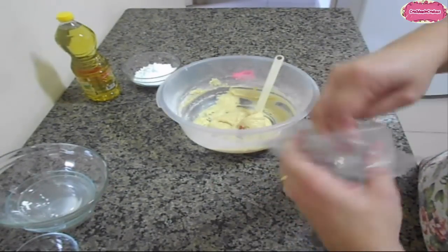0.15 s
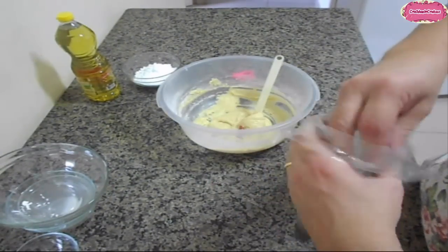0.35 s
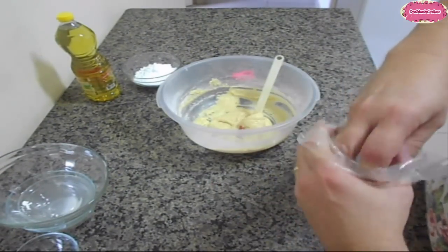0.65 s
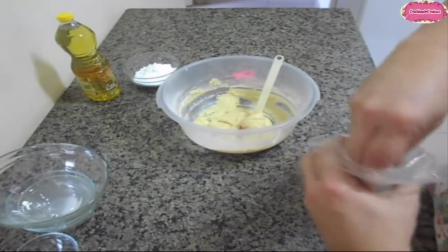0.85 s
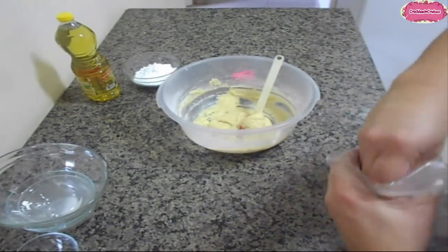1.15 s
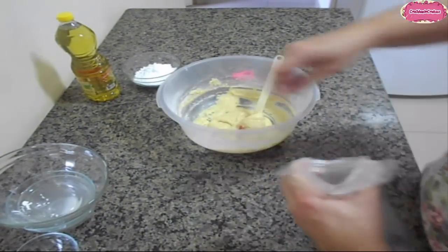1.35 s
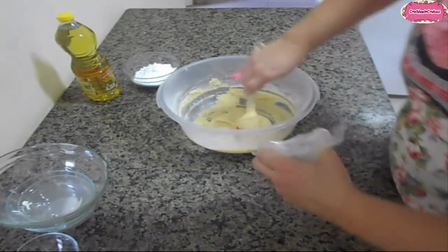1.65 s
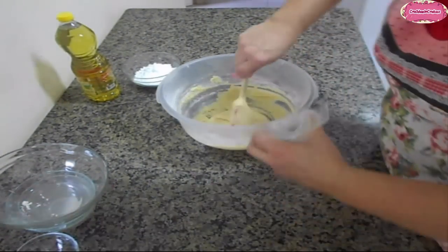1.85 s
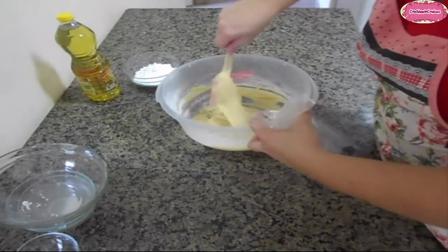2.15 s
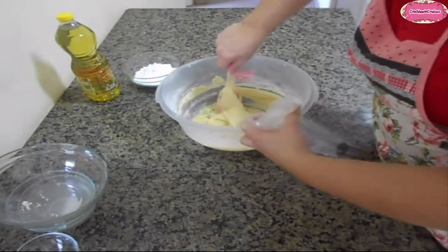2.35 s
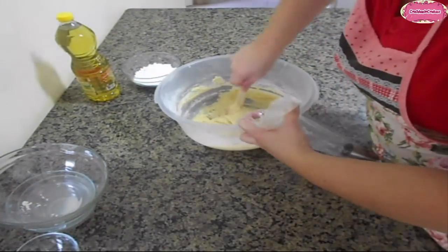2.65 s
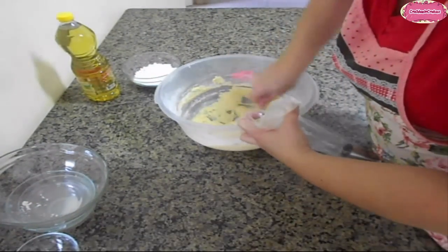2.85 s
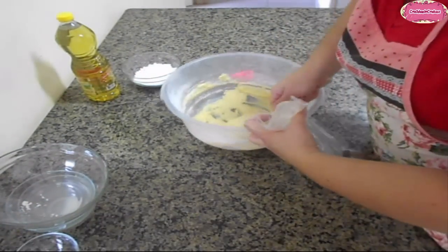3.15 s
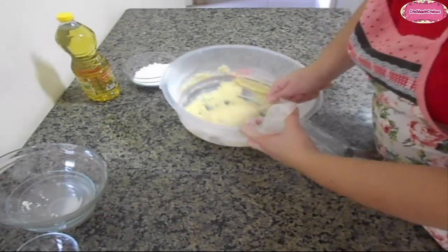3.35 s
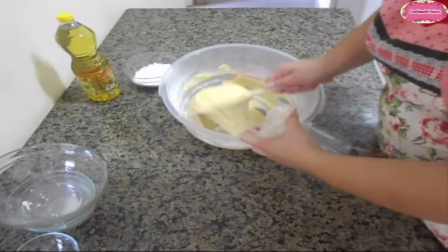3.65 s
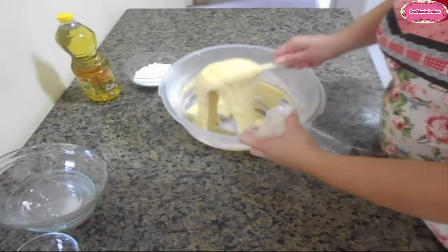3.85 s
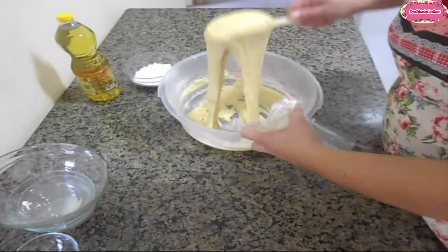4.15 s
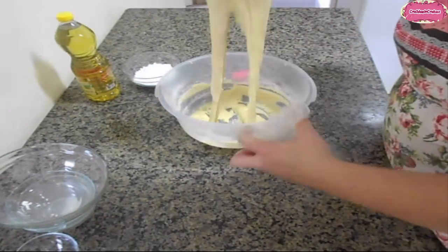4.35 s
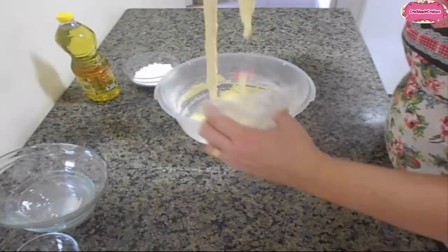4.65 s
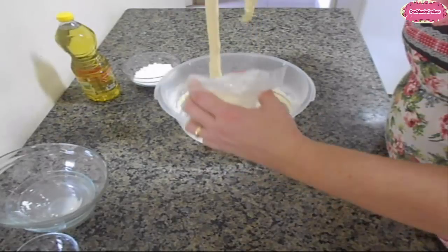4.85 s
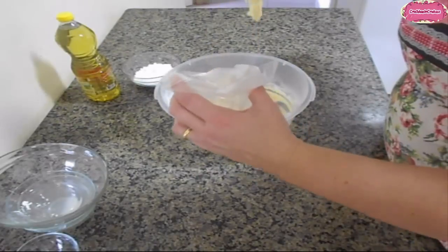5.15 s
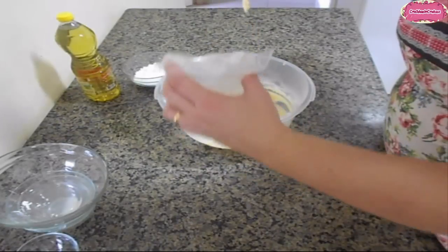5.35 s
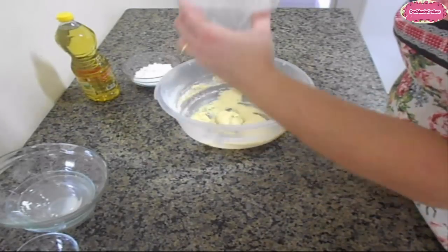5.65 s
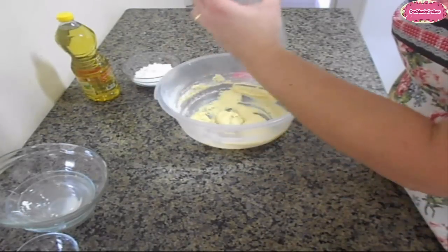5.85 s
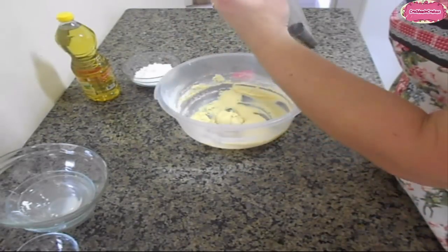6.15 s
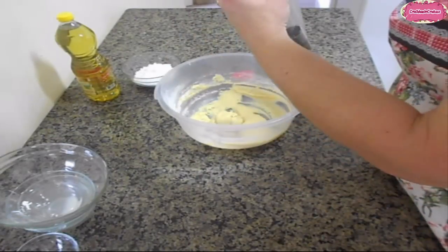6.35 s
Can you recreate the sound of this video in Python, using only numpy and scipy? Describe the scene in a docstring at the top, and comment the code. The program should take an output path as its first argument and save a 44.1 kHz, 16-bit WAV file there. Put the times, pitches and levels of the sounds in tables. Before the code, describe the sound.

Crackling plastic film, soft wet stirring of heavy batter, muffled bowl bumps and one short scrape, over low electrical hum in a reverberant kitchen.

```python
"""A thin plastic piping bag is folded by hand: creases buckle as noise bursts, while folds, wrinkles and film
rustle as random grains and short rings. A spoon in a plastic bowl stirs thick batter (dull grains), knocks
(resonant pushes) and scrapes (stick-slip through wall resonances).
A tiled kitchen reverberates over mains hum (sine harmonics), room noise and a thin whine (filtered noise)."""
import sys
import numpy as np
from scipy import signal
from scipy.fft import rfft, irfft, next_fast_len
from scipy.io import wavfile
from scipy.ndimage import uniform_filter1d, map_coordinates

SR = 44100
rng = np.random.default_rng(int(sys.argv[2]) if len(sys.argv) > 2 else 0)


def transcribe(u):
    """Save the signal u as a 16-bit wav file named by the first command-line argument.

    u: samples, shape (n,) or (channels, n), limited to [-1, 1]; the rate is SR.
    q: integer samples, one column per channel.
    """
    v = np.clip(np.atleast_2d(u).T, -1, 1)
    q = np.round(v * 32767).astype(np.int16)
    wavfile.write(sys.argv[1], SR, q)


N = 287091
TOP_HZ = 15750  # upper band limit


def amp(db):
    """Logarithmic level: decibels to amplitude gain."""
    return 10 ** (np.asarray(db) / 20)


def unit(x):
    """Power normalization: scale to rms 1."""
    return x / np.sqrt(np.mean(x ** 2) + 1e-20)


def along(points, hz):
    """Logarithmic frequency scale: interpolate (frequency_hz, value) points."""
    f, v = np.transpose(points)
    return np.interp(np.log(hz + 1), np.log(f), v)


def curves(rows):
    """Linear interpolation in time: one curve for each column after the time."""
    s, *cols = np.transpose(rows)
    return [np.interp(np.arange(N) / SR, s, c) for c in cols]


def wobble(rate):
    """Slow random modulation: a smooth curve through rate random knots a second."""
    knots = rng.standard_normal(int(N * rate / SR) + 4)
    return map_coordinates(knots, [np.arange(N) * rate / SR])


def coloured(x, gain, size=4096):
    """Minimum-phase filtering: a folded cepstrum makes the given gain of frequency causal."""
    log_gain = np.log(np.maximum(gain(np.fft.rfftfreq(size, 1 / SR)), 1e-6))
    cepstrum = irfft(log_gain)
    cepstrum[1:size // 2] *= 2
    cepstrum[size // 2 + 1:] = 0
    impulse_response = irfft(np.exp(rfft(cepstrum)))
    return signal.fftconvolve(x, impulse_response)[:len(x)]


def hump(hz, centre_hz, octaves):
    """Broad resonance: the gain is 1 at the centre and 1/8 at the given distance in octaves."""
    return (1 + (np.log2((hz + 1) / centre_hz) / octaves) ** 2) ** -3.


def add(track, s, sound):
    """Superposition: mix a sound into the track at time s."""
    part = track[max(round(s * SR), 0):][:len(sound)]
    part += sound[:len(part)]


def burst(envelope, size=9):
    """Spectral whitening: enveloped noise is divided by its smoothed spectrum to remove its broad colour."""
    spectrum = rfft(envelope * rng.standard_normal(len(envelope)))
    power = uniform_filter1d(np.abs(spectrum) ** 2, size)
    return irfft(spectrum / np.sqrt(np.abs(power) + 1e-12), len(envelope))


def grains(rate, spread_db, t60):
    """Stick-slip as a random point process: uneven tiny slips, each a short decaying burst; rms 1."""
    chance = rng.random(N)
    size = np.minimum(rng.standard_normal(N), 2.3)
    power = (chance < rate / SR) * amp(spread_db * size) ** 2
    t = np.arange(SR // 40) / SR
    decay_power = amp(-60 * t / t60) ** 2
    envelope = np.sqrt(np.abs(signal.fftconvolve(power, decay_power)[:N]))
    return unit(envelope * rng.standard_normal(N))


def texture(spectrum, rate, spread_db, t60, smooth):
    """Friction noise: grains over an even rub, filtered to the colour of their material; rms 1."""
    drive = grains(rate, spread_db, t60) + smooth * rng.standard_normal(N)
    return unit(coloured(drive, lambda hz: amp(along(spectrum, hz))))


def crinkles(rate, centre_hz, octaves, cycles, spread_db):
    """Snap-through of wrinkles: each flips at random and rings briefly at its own pitch; rms 1."""
    draws = rng.random((int(rate * N / SR), 4))
    start = (draws[:, :1] * N).astype(int)
    pitch_offset = octaves * (draws[:, 1:2] + draws[:, 2:3] - 1)
    hz = np.minimum(centre_hz * 2 ** pitch_offset, TOP_HZ)
    size = amp(spread_db * np.minimum(-np.log(1 - draws[:, 3:]), 3))
    n = np.arange(SR // 100)
    turns = hz * n / SR
    # each ring falls 60 dB in the given number of cycles
    rings = size * np.sin(2 * np.pi * turns) * amp(-60 * turns / cycles)
    return unit(np.bincount((start + n).ravel(), rings.ravel(), N)[:N])


def strokes(rows, attack_s, release_db_per_s):
    """Movement envelope: gain rises until each start, holds for its length and decays exponentially."""
    t = np.arange(N) / SR
    gains = []
    for s, length, db in rows:
        attack = np.clip(1 + (t - s) / attack_s, 0, 1)
        gains.append(attack * amp(db - release_db_per_s * np.maximum(t - s - length, 0)))
    return np.max(gains, axis=0)


# harmonics of the mains hum: multiple [of MAINS_HZ], relative_level [dB]
HUM_HARMONICS = [(1, 0.5), (2, -20.5), (4, -15), (5, -43.5), (10, -20.5), (11, -15.5), (13, -26)]
MAINS_HZ = 59.25
# slow course of the hum: time_s [s], level_db [dB]
HUM_COURSE = [(0, -56), (.6, -56), (1.7, -49.5), (4.1, -47.5), (4.7, -52), (6.5, -47)]
# swells of the whole background: start_s [s], end_s [s], rise_db [dB]
BACKGROUND_SWELLS = [(2.95, 3.05, 7.5), (3.712, 3.822, 7), (4.07, 4.215, 10), (4.39, 4.516, 7.5),
                     (5.238, 5.645, 8.5), (5.918, 6.096, 7.5), (6.226, 6.488, 5.5)]
SWELL_RISE_S, SWELL_FALL_S = 0.13, 0.026
# spectrum of the room noise: frequency_hz [Hz], relative_level [dB]
AIR_SPECTRUM = [(18, 14.5), (27, 21), (36, 25), (48, -9), (90, 6), (160, 2), (400, -0.5), (700, -4.5),
                (1200, -5.5), (2300, -7.5), (3000, 0.5), (3900, -10), (7000, -6), (15000, -25)]
# bands of the thin high whine: centre_hz [Hz], half_width_hz [Hz], relative_level [dB]
WHINE_BANDS = [(7100, 160, 0), (15000, 200, -7)]


def background(air_db=-53, whine_db=-64, follow=1.0, waver_db=0.9):
    """Additive synthesis and common modulation: hum harmonics, room noise and whine swell together."""
    t = np.arange(N) / SR
    swell_db = np.zeros(N)
    for start, end, db in BACKGROUND_SWELLS:
        rise = np.clip((t - start) / SWELL_RISE_S, 0, 1)
        fall = np.clip(1 - (t - end) / SWELL_FALL_S, 0, 1)
        swell_db += db * rise * fall
    hum_db = curves(HUM_COURSE)[0] + swell_db + waver_db * wobble(9.9)
    phase = 2 * np.pi * MAINS_HZ * t + 0.051 * wobble(3.25)
    hum = sum(amp(db) * np.sin(k * phase + rng.uniform(0, 2 * np.pi)) for k, db in HUM_HARMONICS)
    air = unit(coloured(rng.standard_normal(N), lambda hz: amp(along(AIR_SPECTRUM, hz))))

    def whine_gain(hz):
        return sum(amp(db) / (1 + ((hz - c) / w) ** 2) for c, w, db in WHINE_BANDS)

    whine = unit(coloured(rng.standard_normal(N), whine_gain))
    noise = amp(air_db) * air + amp(whine_db) * whine
    return amp(hum_db) * unit(hum) + amp(follow * (hum_db - hum_db.mean())) * noise


# reverberation of the kitchen: frequency_hz [Hz], t60_s [s]
KITCHEN_DECAY = [(200, 0.44), (1000, 0.59), (4000, 0.51), (9000, 0.24), (15000, 0.36)]


def kitchen(x, count=16):
    """Diffuse reverberation: hard walls answer with decaying noise, redrawn for each of count equal stretches."""
    out = np.zeros(N)
    for part in np.array_split(np.arange(N), count):
        hz, t, z = signal.stft(rng.standard_normal(SR // 2), SR, nperseg=256)
        decay = amp(-60 * t / along(KITCHEN_DECAY, hz)[:, None])
        tail = signal.istft(z * decay, SR, nperseg=256)[1]
        reply = signal.fftconvolve(x[part], tail / np.linalg.norm(tail))
        add(out, part[0] / SR + .005, reply)
    return out


# spectrum of the batter: frequency_hz [Hz], relative_density [dB per Hz]
BATTER_SPECTRUM = [(60, -18.5), (160, -6.5), (450, 2), (900, 0.5), (1600, -7), (4000, -44)]
# the spoon moves the batter: start_s [s], length_s [s], level_db [dB, before the batter's gain]
BATTER_STIRS = [(1.61, 0.29, -55.5), (1.93, 0.2, -46), (2.375, .14, -44.5), (2.545, 0.051, -42),
                (2.87, .12, -53.5), (3.02, 0.063, -42.5), (3.28, 0.26, -53.5), (3.73, 0.2, -51.5),
                (4.1, 0.12, -49.5), (4.31, 0.16, -42), (5.11, 0.087, -54), (5.27, 0.31, -51),
                (5.87, 0.25, -54.5), (6.25, 0.16, -49.5)]
STIR_ATTACK_S, STIR_RELEASE_DB_PER_S, BATTER_REST_DB = 0.043, 162, -61


def batter(batter_db=-2):
    """Viscous friction: the spoon squelches through batter as dull grains over a quiet resting level."""
    stir = strokes(BATTER_STIRS, STIR_ATTACK_S, STIR_RELEASE_DB_PER_S)
    stir = np.hypot(stir, amp(BATTER_REST_DB))
    squelch = texture(BATTER_SPECTRUM, rate=160, spread_db=1.5, t60=0.051, smooth=0.33)
    return stir * amp(batter_db) * squelch


# the spoon bumps the bowl through the batter: start_s [s], level_db [dB peak, before knock_db], pitch_hz [Hz]
BOWL_KNOCKS = [(.247, -43, 260), (1.627, -44, 415.2), (1.930, -26.5, 524), (2.391, -32.5, 507),
               (2.5405, -23, 420), (3.412, -36.5, 860), (3.855, -31.5, 810), (4.395, -34.5, 182),
               (4.451, -36, 561), (4.649, -40, 430), (5.678, -32, 658)]


def knocks(shudder_t60=0.084, shudder_db=-28, knock_db=4):
    """Damped impact: a soft push and the loaded bowl's brief shudder excite one broad resonance."""
    out, t = np.zeros(N), np.arange(SR // 10) / SR
    for s, db, hz in BOWL_KNOCKS:
        shudder = amp(shudder_db - 60 * t / shudder_t60) * rng.standard_normal(len(t))
        push = (t == 0) + shudder
        bump = coloured(push, lambda f: hump(f, hz, octaves=1.69))
        add(out, s, amp(db + knock_db) * bump / np.abs(bump).max())
    return out


# resonances of the bowl's wall: centre_hz [Hz], width_hz [Hz], relative_level [dB]
BOWL_MODES = [(1500, 213, 8), (1800, 290, 6.5), (2070, 174, -5), (2700, 320, 4), (3240, 230, -16)]
# the spoon drags along the wall: time_s [s], level_db [dB]
SCRAPE_COURSE = [(2.95, -73), (3.0, -45), (3.03, -36), (3.045, -32), (3.085, -34.5), (3.11, -47),
                 (3.17, -71)]


def scrape():
    """Stick-slip and modal resonance: the dragging spoon's slips drive the bowl's wall."""
    def wall(f):
        response = 0
        for k, (c, w, db) in enumerate(BOWL_MODES):
            response = response + (-1) ** k * amp(db) * 1j * f * w / (c * c - f * f + 1j * f * w)
        return np.abs(response)

    slips = grains(rate=200, spread_db=6, t60=0.024)
    return amp(curves(SCRAPE_COURSE)[0]) * unit(coloured(slips, wall))


# fingers press into the bag: start_s [s], length_s [s], level_db [dB, before the fingers' gain]
FINGER_PRESSES = [(.54, 0.071, -50), (.8, 0.035, -50.5), (1.03, 0.041, -45.5), (1.22, 0.093, -48.5)]


def fingers(level_db=-2):
    """Damped friction: fingers pushed into the bag rub with the same dull colour as the batter."""
    press = strokes(FINGER_PRESSES, attack_s=0.023, release_db_per_s=128.5)
    rub = texture(BATTER_SPECTRUM, rate=140, spread_db=2.5, t60=0.042, smooth=0.41)
    return amp(level_db) * press * rub


# hands grip and fold the bag: start_s [s], length_s [s], crumpling_db [dB], sliding_over_crumpling_db [dB]
HAND_GRIPS = [(0, 0.0072, -40, 9), (.06, .09, -47, -1.5), (.205, 0.14, -40.5, 10.5),
              (0.34, 0.22, -42.5, 9.5), (0.52, 0.155, -41.5, 13), (0.691, 0.039, -42.5, 10),
              (0.798, 0.12, -44, 12.5), (0.885, 0.13, -42.5, 11.5), (1.015, 0.1, -41, 10.5),
              (1.187, 0.085, -37, 7), (1.302, 0.083, -41.5, 4), (1.54, 0.28, -45, -1.5),
              (1.829, 0.075, -43, 7), (1.917, 0.19, -39, 3.5), (2.312, 0.047, -44, -0.5),
              (2.364, 0.18, -33.5, -1), (2.887, 0.24, -52, -3), (3.028, .025, -39.5, 0),
              (3.204, 0.23, -53.5, -1.5), (3.397, 0.058, -37.5, 1.5), (3.505, 0.112, -45, -1),
              (3.723, 0.099, -44, -5), (3.843, 0.085, -42.5, 3), (3.97, .31, -49.5, -8.5),
              (4.312, 0.027, -33.5, -2), (4.378, 0.053, -30, 0.5), (4.55, 0.15, -54, 11),
              (5.327, 0.29, -45.5, -8), (5.684, 0.025, -46, 0), (5.846, 0.16, -52, -5.5),
              (6.142, .04, -58.5, 15.5), (6.228, 0.29, -48.5, -2.5)]
GRIP_ATTACK_S, GRIP_RELEASE_DB_PER_S = 0.022, 150
HELD_FOLDS_DB, HELD_FILM_DB = -59, -54  # the bag merely held


def handling():
    """Excitation strength: gains of crumpling and sliding, each power-summed with a held level."""
    folding = [(s, length, db) for s, length, db, _ in HAND_GRIPS]
    sliding = [(s, length, db + over) for s, length, db, over in HAND_GRIPS]
    crumple = strokes(folding, GRIP_ATTACK_S, GRIP_RELEASE_DB_PER_S)
    slide = strokes(sliding, GRIP_ATTACK_S, GRIP_RELEASE_DB_PER_S)
    return np.hypot(crumple, amp(HELD_FOLDS_DB)), np.hypot(slide, amp(HELD_FILM_DB))


# spectrum of the crumpling folds: frequency_hz [Hz], relative_level [dB]
FOLD_SPECTRUM = [(300, -19), (900, -10), (1700, -0.5), (2800, 1), (4500, -2.5), (8000, -22), (16000, -25)]
# spectrum of the sliding film: frequency_hz [Hz], relative_level [dB]
FILM_SPECTRUM = [(800, -16), (2500, -6.5), (4800, -1), (8000, -1), (12500, -3.5), (15500, -6.5)]


def rustle(crumple, slide, folds_db=-3.0, wrinkles_db=-6, film_db=0):
    """Crumpling and friction: folds tick coarsely, wrinkles flip and film slides over the hand in a fine fizz."""
    grip_db = 1.6 * wobble(70) + .9 * wobble(22)
    folds = texture(FOLD_SPECTRUM, rate=520, spread_db=4.5, t60=.006, smooth=.45)
    wrinkles = crinkles(rate=330, centre_hz=3400, octaves=1.7, cycles=18, spread_db=6)
    film = texture(FILM_SPECTRUM, rate=1600, spread_db=5, t60=.0025, smooth=.55)
    crumpling = crumple * (amp(folds_db) * folds + amp(wrinkles_db) * wrinkles)
    sliding = slide * amp(film_db) * film
    return amp(grip_db) * (crumpling + sliding)


def snaps(rows, crack_t60=0.01, attack=0.00013, flutter_db=-13, bounce_db=-8, level_db=-1):
    """Buckling and reflection: a crease cracks, the film flutters, and the counter throws the crack back."""
    lead, flutter_t60 = .003, .022  # s
    window = .005 * SR  # level is the rms over 5 ms
    out, t = np.zeros(N), np.maximum(np.arange(SR // 25) / SR - lead, 0)
    for s, db, hz, octaves in rows:
        late = t - rng.uniform(0.0011, 0.0032)
        crack = amp(-60 * t / crack_t60)
        bounce = (late > 0) * amp(bounce_db - 60 * np.abs(late) / crack_t60)
        flutter = amp(flutter_db - 60 * t / flutter_t60)
        envelope = (crack + bounce + flutter) * (1 - np.exp(-t / attack))
        snap = coloured(burst(envelope, size=95), lambda f: hump(f, hz, octaves), size=1024)
        add(out, s - lead, amp(db + level_db) * snap / np.sqrt(np.sum(snap ** 2) / window))
    return out


# small random creases at full grip; levels are before the snaps' gain
SMALL_PER_S, SMALL_DB, SMALL_SCATTER_DB, SMALL_HZ, SMALL_OCTAVES = 36, -25.5, 2, 5200, 2.7
# a lighter grip makes them rarer and weaker: dB of rate and dB of level per dB of handling
RARER, WEAKER = .65, .55


def small_snaps(effort, count=400):
    """Random buckling: small creases give way more often and louder the harder the bag is worked."""
    when, chance, size, pitch = rng.random((count, 4)).T
    grip = effort[(when * N).astype(int)] / effort.max()
    db = SMALL_DB + WEAKER * 20 * np.log10(grip) + SMALL_SCATTER_DB * (2 * size - 1)
    hz = SMALL_HZ * 2 ** (pitch - .5)
    rows = np.column_stack([when * N / SR, db, hz, np.full(count, SMALL_OCTAVES)])
    return rows[chance < SMALL_PER_S * grip ** RARER * N / SR / count]


# creases snapping over, loud ones and quiet ones heard singly:
# start_s [s], level_db [dB, before the snaps' gain], pitch_hz [Hz], width_octaves [octaves]
CREASE_SNAPS = [(.043, -25.5, 7560, 1.6), (.2175, -21.5, 6650, 4.2), (.2443, -16.5, 8200, 3.36),
                (.559, -23, 7000, 2.4), (.9606, -21.5, 5200, 2.5), (1.2363, -22.5, 3690, 4.4),
                (1.3694, -24, 5440, 0.82), (1.417, -29.5, 5340, 1.27), (1.537, -29.5, 6700, 3),
                (1.6536, -29.5, 4500, 2.7), (1.6904, -28, 5230, 2), (1.7099, -28.5, 4480, 0.59),
                (1.8959, -14.5, 5700, 2.3), (1.9353, -19.5, 4210, 3.5), (2.0326, -21, 8600, 2.5),
                (2.0719, -19.5, 6240, 1.6), (2.0913, -16, 7700, 2.1), (2.332, -22, 4700, 2.1),
                (2.3637, -24.5, 4130, 3.2), (2.3818, -24, 5200, 2.1), (2.396, -18, 4400, 2.6),
                (2.401, -16.5, 4240, 2.6), (2.4555, -19, 5000, 2.2), (2.4643, -16, 5300, 2.3),
                (2.4884, -19, 3840, 2), (2.5307, -20, 5540, 2.8), (2.5552, -16, 6810, 1.7),
                (2.6176, -17, 9200, 2.3), (2.7224, -31.5, 4590, 2.1), (2.857, -28.5, 3940, 3),
                (2.9912, -31, 2500, 2.8), (3.0022, -27.5, 3890, 4.1), (3.0207, -31, 2800, 1.9),
                (3.0481, -19.5, 2400, 3.5), (3.061, -20.5, 4200, 2.1), (3.0669, -14, 4540, 3.3),
                (3.0798, -10.5, 5400, 2.9), (3.1694, -30, 4780, 2.5), (3.195, -30.5, 3200, 4.1),
                (3.2526, -34, 3420, 2.9), (3.3293, -24.5, 6950, 2.6), (3.4116, -17.5, 6250, 3.5),
                (3.4658, -22, 4850, 2.3), (3.5219, -24.5, 4870, 3.3), (3.5473, -22.5, 5840, 2.8),
                (3.7169, -28, 5230, 3), (3.788, -23.5, 4100, 1.9), (3.8068, -23, 8600, 1.9),
                (3.8448, -19.5, 6440, 2.1), (3.8564, -20.5, 4860, 3.2), (3.9049, -23.5, 5640, 2.1),
                (4.1512, -31, 2330, 2.8), (4.2246, -16.5, 5560, 4.1), (4.2298, -15.5, 5800, 1.8),
                (4.246, -21.5, 4700, 3.9), (4.2893, -22, 6200, 2.3), (4.3025, -22, 2750, 2.6),
                (4.3214, -19.5, 3150, 3.6), (4.3283, -21, 2880, 3), (4.401, -11.5, 5750, 3.1),
                (4.434, -15, 5830, 2.5), (4.4781, -18.5, 5330, 2.6), (4.5, -16.5, 5830, 1.8),
                (4.648, -21.5, 5400, 3.1), (4.7542, -21.5, 11300, 1.25), (4.858, -39, 3480, 3.1),
                (4.8885, -25, 9100, 1.6), (4.992, -39.5, 7000, 1.8), (5.1082, -18.5, 5770, 2.8),
                (5.2026, -32, 4400, 1.55), (5.2943, -30, 2700, 2.8), (5.35, -34.5, 2880, 1.4),
                (5.4079, -20.5, 2590, 1.08), (5.559, -20, 6550, 2.15), (5.6775, -15, 3900, 2.5),
                (5.722, -27.5, 6200, 2.4), (5.837, -32, 2880, 3.4), (5.935, -33.5, 3170, 1.9),
                (6.12, -18, 8600, 2), (6.3416, -28, 3520, 1.3), (6.3816, -21, 3800, 1.6),
                (6.458, -27.5, 2180, 1.06)]


def creases(effort):
    """Snap-through buckling: timed creases together with random small ones that follow the handling."""
    return snaps([*CREASE_SNAPS, *small_snaps(effort)])


def scene():
    """Direct and reverberant sound: bag and spoon close by, in the room, over the background."""
    crumple, slide = handling()
    bag = rustle(crumple, slide) + fingers()
    bowl = batter() + knocks() + scrape()
    snapping = creases(np.hypot(crumple, slide))
    room = kitchen(amp(-10.5) * snapping + amp(-11) * bag + amp(-8.0) * bowl)
    return (snapping + bag + bowl + room + background())[None]


def record(dry, notch_hz=11100, notch_width_hz=420, notch_db=-10):
    """Soft saturation and band limiting: the microphone rounds peaks, with a treble notch and a steep cutoff."""
    rounded = dry / (1 + (dry / .75) ** 4) ** .25
    m = next_fast_len(N + SR // 2)
    hz = np.fft.rfftfreq(m, 1 / SR)
    notch = amp(notch_db * np.exp(-((hz - notch_hz) / notch_width_hz) ** 2))
    limit = 1 / np.sqrt(1 + (hz / TOP_HZ) ** 260)
    return irfft(rfft(rounded, m) * notch * limit, m)[..., :N]


dry = scene()
out = record(dry)
transcribe(out)
```